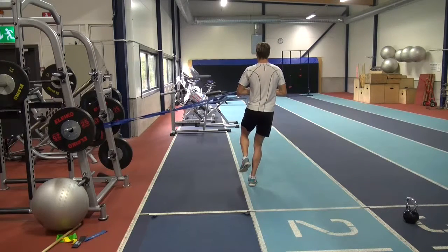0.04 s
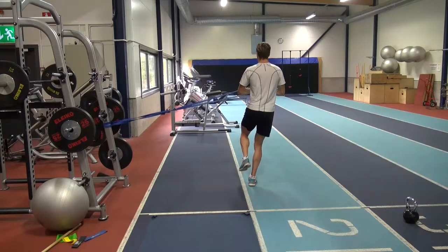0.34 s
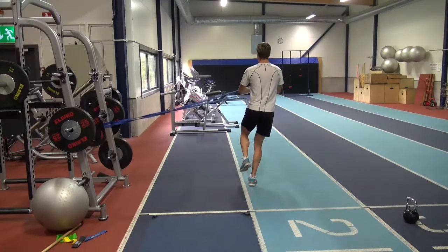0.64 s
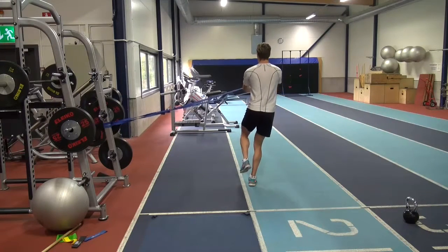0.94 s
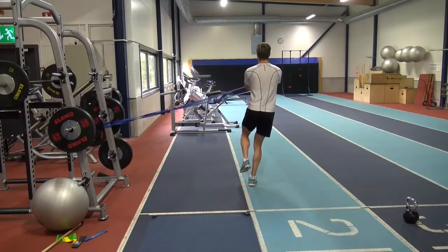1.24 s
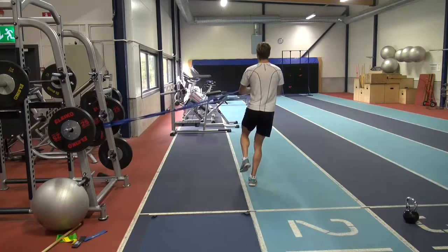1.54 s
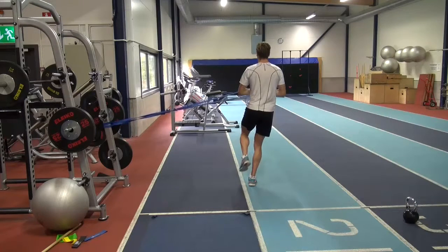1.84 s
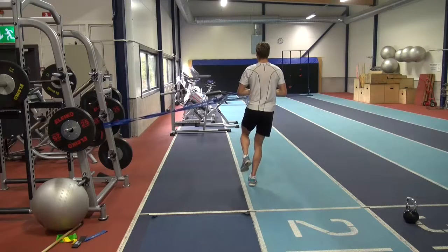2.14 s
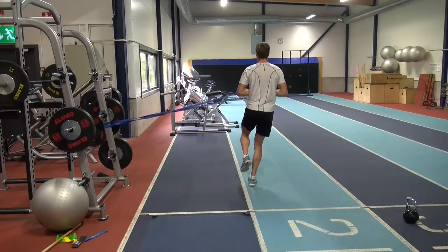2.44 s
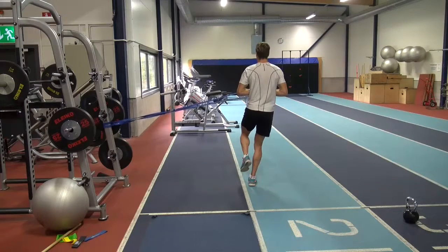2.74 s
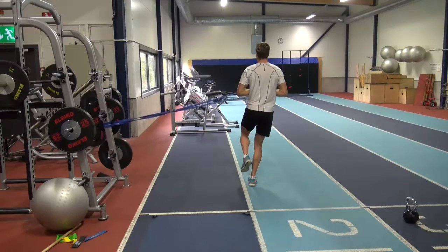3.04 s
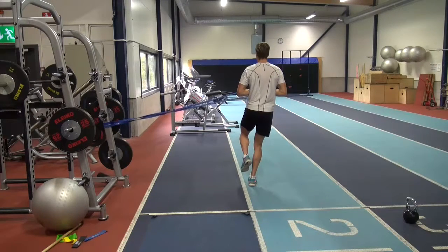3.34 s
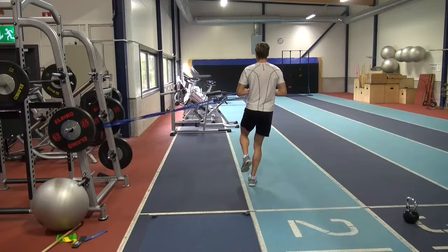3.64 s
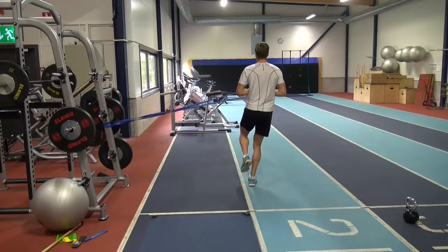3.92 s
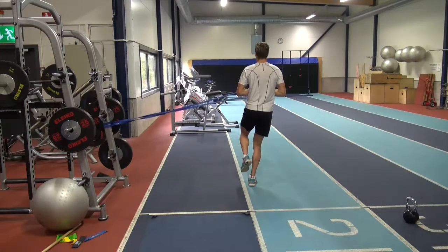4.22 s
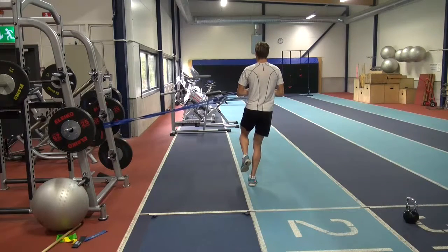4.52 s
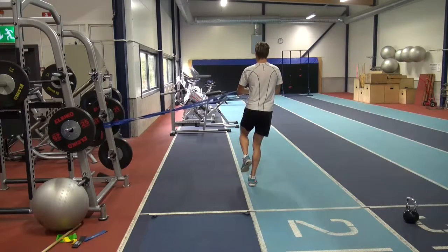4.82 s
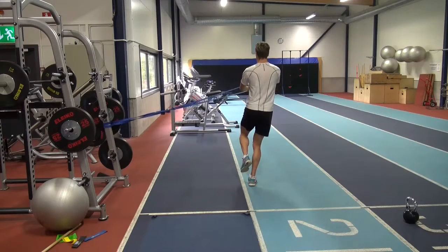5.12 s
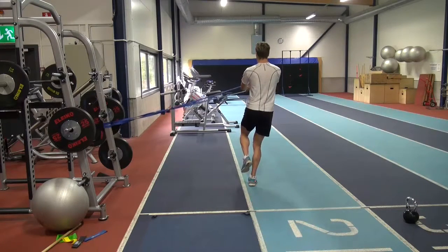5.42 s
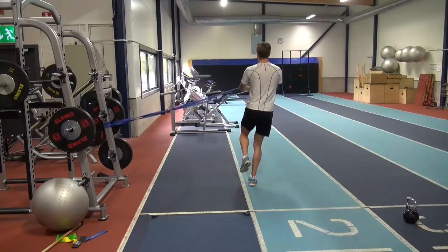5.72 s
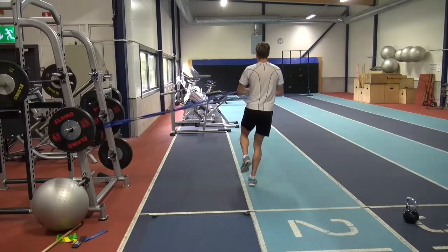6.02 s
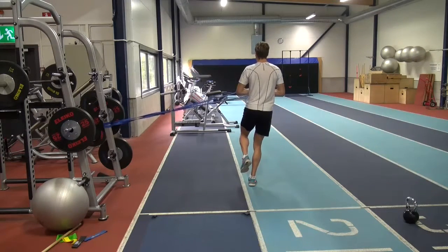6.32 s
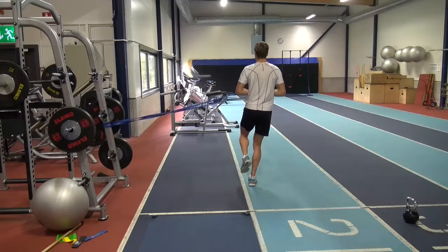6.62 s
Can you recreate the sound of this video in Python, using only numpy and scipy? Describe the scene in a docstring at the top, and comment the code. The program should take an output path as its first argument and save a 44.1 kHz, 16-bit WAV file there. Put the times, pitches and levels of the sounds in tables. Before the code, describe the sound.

Ventilation hums and rushes in a big, echoing gym. A few metres off, a barbell clinks sharply as it is pulled, and clothing rustles softly. After a faint, far squeak, the weight lands with a loud thud and a short rattle. A second run of steel clinks follows, then another heavy drop that bounces and settles with light clinks, ringing on through the hall.

```python
"""Barbell lifts in a sports hall

Two lifts, a few metres away. Steel sleeves and collars clink as the bar is pulled and caught,
and clothes swish; then the rubber plates knock down on the platform, rattle and bounce.
The hall rings on after every blow, over the hum and rush of its ventilation.
A far machine squeaks once."""
import sys
import numpy as np
from scipy import signal
from scipy.fft import rfft, irfft
from scipy.io import wavfile
from scipy.ndimage import uniform_filter1d

SR = 44100
rng = np.random.default_rng(int(sys.argv[2]) if len(sys.argv) > 2 else 0)


def waveform_to_disk(signal):
    """Save audio, clipped to [-1, 1], as 16-bit WAV at the path in sys.argv[1]."""
    frames = np.transpose(np.atleast_2d(signal))
    scaled = np.clip(frames, -1, 1) * 32767
    samples = np.round(scaled).astype(np.int16)
    wavfile.write(sys.argv[1], SR, samples)


N = 302948


def amp(db):
    """Decibels to gain."""
    return 10 ** (np.asarray(db) / 20)


def seconds(length):
    """Time axis of the given length."""
    return np.arange(int(length * SR)) / SR


def fade(t, t60):
    """Free decay, 60 dB down after t60."""
    return np.exp(-np.log(1000) * t / t60)


def add(out, s, sound):
    """Mix a sound in at time s."""
    start = max(int(s * SR), 0)
    out[start:start + len(sound)] += sound[:len(out) - start]


def white(size):
    """Noise of rms 1 with a flat spectrum and random phases."""
    return irfft(np.exp(2j * np.pi * rng.random(size // 2 + 1)), size) * np.sqrt(size)


def colour(x, points, size=4096):
    """EQ through (f/Hz, level/dB) points that keeps the power of white noise."""
    hz, db = np.transpose(points)
    log_hz = np.log(np.maximum(np.fft.rfftfreq(size, 1 / SR), 1))
    curve_db = np.interp(log_hz, np.log(hz), db)
    # minimum phase keeps the attacks sharp
    cepstrum = irfft(np.log(amp(curve_db)))
    cepstrum[1:size // 2] *= 2
    cepstrum[size // 2 + 1:] = 0
    response = irfft(np.exp(rfft(cepstrum)))
    return signal.fftconvolve(x, response / np.linalg.norm(response))[:len(x)]


def drift(rate_hz):
    """Slow random wander of spread 1."""
    lowpass = np.exp(-(np.fft.rfftfreq(N, 1 / SR) / rate_hz) ** 2)
    slow = irfft(rfft(white(N)) * lowpass, N)
    return slow / np.std(slow)


def tone(hz):
    """A sine that follows a pitch curve."""
    return np.sin(2 * np.pi * np.cumsum(hz) / SR)


def spray(envelope, smooth_bins):
    """Dense random impacts under an envelope, about even at all pitches; unit energy."""
    spectrum = rfft(white(len(envelope)) * envelope)
    spectrum /= np.sqrt(uniform_filter1d(np.abs(spectrum) ** 2, size=smooth_bins))
    return irfft(spectrum, len(envelope))


def burst(t, t60):
    """A contact: a spray of tiny impacts that dies quickly."""
    envelope = fade(t, t60)
    return spray(envelope, smooth_bins=201) * np.linalg.norm(envelope) * (t < 2 * t60)


def ring(t, modes, pitch, scatter_db, spread):
    """Struck modes; their strengths and tuning vary with the point of contact."""
    hz, db, t60 = np.transpose(modes)
    strength, detune = rng.standard_normal((2, len(hz)))
    gain = amp(db + scatter_db * strength)
    tuned_hz = hz * pitch * (1 + spread * detune)
    waves = np.sin(2 * np.pi * np.outer(tuned_hz, t)) * fade(t, t60[:, None])
    return gain @ waves / np.linalg.norm(gain)


def ventilation():
    """Room tone: a wavering fan and a motor drone over duct rumble and the steady rush of air."""
    # swell of the fan tone: t/s, relative level/dB
    fan_swell = [(0, -55.4), (0.9, -51.7), (1.7, -53.3), (2.1, -59.4), (3.3, -53.5), (4.3, -55.7),
                 (6.87, -54.0)]
    # spectrum of the ducts: f/Hz, level/dB
    duct_eq = [(20, -17), (35, -3), (57, -6.5), (80, -8), (110, -11), (200, -14), (300, -18), (450, -16.5),
               (900, -53.5)]
    # spectrum of the vents: f/Hz, level/dB
    vent_eq = [(130, -30.5), (215, -6.5), (271, -8.5), (308, -1), (336, -18.5), (508, -8), (607, -7),
               (739, -3.5), (1000, -6.5), (1840, -13), (3150, -17), (15500, -23)]
    fan_hz, motor_hz, flutter_db = 162.6, 55.8, 1.9
    fan_db = np.interp(np.arange(N) / SR, *np.transpose(fan_swell)) - 1 + flutter_db * drift(8.7)
    fan = amp(fan_db) * tone(fan_hz + 1.65 * drift(9.9))
    motor = amp(-62.5) * (1 + 0.36 * drift(2.0)) * tone(motor_hz + 2.33 * drift(4.6))
    rumble = amp(-57.5) * colour(white(N), duct_eq)
    air = amp(-55.48) * colour(white(N), vent_eq)
    return np.sqrt(2) * (fan + motor) + rumble + air


def clinks(end_count=2):
    """Loose sleeves and collars at the ends of the bar clack and set the steel ringing."""
    # knocks on the bar: t/s, clack level/dB, clack cutoff/Hz, ring level/dB, ring centre/Hz
    knocks = [(.124, -35, 4200, -30.5, 3200), (.192, -37.5, 3000, -31.5, 2920),
              (.4335, -25, 3150, -20, 2330), (0.4874, -27, 6900, -24, 3900), (.571, -32, 3580, -27, 3000),
              (2.667, -45, 3000, -28.5, 3000), (3.441, -33.5, 2600, -34.5, 3000),
              (3.474, -31, 2560, -35.5, 3520), (3.743, -25, 3250, -24.5, 2200),
              (3.798, -25, 7400, -22.5, 4700), (3.902, -31, 3000, -24, 1200),
              (4.144, -39.5, 3000, -39, 2400), (4.404, -43, 2430, -46, 2820), (6.091, -47, 2806, -35, 3000),
              (6.184, -46, 2800, -34, 2970)]
    # spectrum of a sleeve's clack: f/Hz, level/dB
    sleeve_eq = [(40, -5), (70, 1), (130, -10.5), (260, -2.5), (550, -2.5), (850, -6), (1220, -1.5),
                 (1900, -7.5), (2550, -3.5), (3800, -8), (5200, -12.5), (6300, -12.5), (10000, -10),
                 (15000, -44)]
    # modes of the bar and its sleeves: f/Hz, level/dB, t60/s
    steel_modes = [(1156, 5, 0.086), (1226, 5, 0.04), (1525, -19, .05), (2346, -1.5, 0.052),
                   (2510, 2, 0.033), (2796, 2, 0.037), (3020, -2.5, 0.083), (3044, 0, 0.11),
                   (3500, -10, 0.058), (3860, -11.5, 0.045), (4190, -5.5, 0.069), (4680, -5.5, 0.074),
                   (5150, -5, 0.095), (5280, -3.5, 0.089), (5400, -8.5, 0.12), (5830, -9, 0.057),
                   (6800, -13.5, 0.066), (7750, -6, 0.055), (7970, -3, .07), (9300, -5, 0.067),
                   (10200, -8, 0.065), (12700, -8, .06)]
    ends, t = np.zeros((end_count, N)), seconds(.3)
    attack = 1 - np.exp(-(t / 0.0027) ** 2)  # the sleeve slides home rather than meeting the bar flat
    contacts = [contact for knock in knocks for contact in rebound(*knock)]
    for k, (s, clack_db, cutoff_hz, ring_db, centre_hz) in enumerate(contacts):
        lowpass = signal.butter(3, cutoff_hz, fs=SR)
        clack = signal.lfilter(*lowpass, colour(burst(t, t60=0.08), sleeve_eq))
        # the place of the contact favours the modes around one pitch
        modes = [(hz, db - 11 * abs(np.log2(hz / centre_hz)), t60) for hz, db, t60 in steel_modes]
        steel = ring(t, modes, pitch=1, scatter_db=3.5, spread=0.0085)
        clink = attack * (amp(clack_db - 1) * clack + amp(ring_db - 5) * steel)
        add(ends[k % end_count], s, clink)
    return sum(end + amp(-7.5) * hall(end) for end in ends)


def rebound(s, clack_db, cutoff_hz, ring_db, centre_hz):
    """The two contacts of one clink: the sleeve strikes, springs back and strikes more softly."""
    return [(s, clack_db, cutoff_hz, ring_db, centre_hz),
            (s + .017, clack_db - 4.5, cutoff_hz, ring_db - 3.5, centre_hz)]


def hall(x):
    """Reverb from one spot: dense reflections off floor and racks, a long tail, a soft far-wall slap."""
    # reverb bands: f/Hz, early level/dB, tail level/dB, tail t60/s
    bands = [(60, -2, 4.5, 1.75), (159, 2, -6.5, 4.3), (416, 7.5, -6.5, 4), (1050, 3, -6, 3),
             (2380, 4, -4.5, 2.8), (5180, 3, -7.5, 1.83), (8500, -0.5, -18, 1), (14300, -32, -25, 0.2)]
    t = seconds(2)
    log_hz = np.log(np.maximum(np.fft.rfftfreq(len(t), 1 / SR), 1))
    centres = np.log([row[0] for row in bands])
    early_envelope = fade(t, 0.41) * (1 - np.exp(-(t / 0.0065) ** 2))
    early_spectrum = rfft(spray(early_envelope, smooth_bins=121) * (t < 1))
    tail_spectrum = rfft(white(len(t)))
    far_wall = 1 + 0.63 * np.exp(-((t - .265) / 0.065) ** 2)
    response = np.zeros(len(t))
    for share, (_, early_db, tail_db, t60) in zip(np.eye(len(bands)), bands):
        band = np.interp(log_hz, centres, share)
        decay = fade(t, t60) * (1 - np.exp(-t / 0.032)) * far_wall
        response += amp(early_db) * irfft(early_spectrum * band, len(t))
        response += amp(tail_db) * irfft(tail_spectrum * band, len(t)) * decay / np.linalg.norm(decay)
    return signal.fftconvolve(x, response)[:N]


def clothes():
    """Fabric hisses briefly as the lifter pulls."""
    # one swish a pull: t/s, level/dB, half length/s
    swishes = [(0.41, -56, 0.089), (3.734, -57, 0.14)]
    t = np.arange(N) / SR
    swell = sum(amp(db) * np.exp(-((t - s) / half_length) ** 2) for s, db, half_length in swishes)
    flutter = amp(2 * drift(40))
    hiss = colour(white(N), [(1000, 2), (5000, 0), (12000, 3), (15500, -10)])
    return swell * flutter * hiss


def squeak():
    """Dry friction in a far machine gives a faint, unsteady tone."""
    # the squeak: t/s, length/s, f/Hz, level/dB
    chirp = (1.64, .2, 1480, -59)
    s, length, hz, db = chirp
    out = np.zeros(N)
    whine = tone(hz * (1 + .012 * drift(40)))
    swell = np.sin(np.pi * seconds(length) / length)
    add(out, s, amp(db) * swell * whine[:len(swell)])
    return out


def landings(spot_count=3):
    """Each landing thuds in the platform, clacks in the plates and cracks at their edge."""
    # main blows, one list a drop: t/s, thud level/dB, thud pitch ratio, clack level/dB, crack level/dB
    drops = [
        [(2.3712, -10, 1.44, -14, -11.5), (2.3845, -15, 1.15, -23, -6), (2.4025, -3, 0.96, -17.5, -38),
         (2.411, -9, 1.1, -19.5, -34), (2.5, -18, 0.99, -26.5, -55)],
        [(5.741, -9.5, 1.7, -8, -11.5), (5.7536, -3.5, 0.93, -14.5, -19.5), (5.7755, -14.5, 1.09, -27, -26),
         (5.801, -17, 1.3, -16, -44)],
    ]
    # modes of the platform: f/Hz, level/dB, t60/s
    platform_modes = [(72.7, -26.5, 0.26), (117.8, -21.5, 0.11), (258, -15, 0.022), (328.5, -3, 0.034),
                      (405.2, 1.5, .035), (500, -4, 0.027), (658, -11.5, 0.034)]
    # spectrum of a plate's clack: f/Hz, level/dB
    clack_eq = [(100, -10.5), (400, 1), (750, 3.5), (1200, 2), (1850, -6), (2450, -7), (4000, -14),
                (5500, -33.5), (12000, -30)]
    # spectrum of the crack at its edge: f/Hz, level/dB
    crack_eq = [(300, 2.5), (2000, -2), (4000, 1.5), (5800, -5.5), (8000, -5.5), (10400, -2),
                (12500, -13.5), (15000, -25)]
    direct, spots, t = np.zeros(N), np.zeros((spot_count, N)), seconds(.5)
    attack = 1 - np.exp(-t / .0011)  # rubber gives way and softens the thud
    contacts = [contact for blows in drops for contact in drop(blows)]
    for k, (s, thud_db, pitch, clack_db, crack_db) in enumerate(contacts):
        thud = amp(thud_db - 1.5) * attack * ring(t, platform_modes, pitch, scatter_db=2.5, spread=0.019)
        clack = amp(clack_db - 2.5) * colour(burst(t, t60=0.029), clack_eq)
        crack = amp(crack_db - 2.5) * colour(burst(t, t60=0.0048), crack_eq)
        add(direct, s, thud + clack + crack)
        # the plates touch down in turn at different spots; the platform stirs the hall less than they do
        add(spots[k % spot_count], s, amp(-5) * thud + clack + crack)
    return direct + sum(hall(spot) for spot in spots)


def drop(blows, rattle_count=6):
    """All contacts of one drop, laid out like its blows: floor tremor, boom, blows, rattle, bounces."""
    # the bar bounces and settles: delay/s, thud level/dB, thud pitch ratio, clack level/dB
    settling = [(.24, -29, 0.88, -29.5), (.325, -31, .25, -49), (.656, -29.5, .8, -55)]
    start, silent = blows[0][0], -np.inf
    tremor = (start - 0.01475, -26, 0.8, silent, silent)  # the floor carries the blow ahead of the air
    boom = (start - 0.0034, -18, .2, silent, silent)  # the whole floor gives under the weight
    # the loose plates rattle, growing weaker and much duller
    gap_s, jitter_s, fall_db_per_s, dulling_db_per_s = .012, .002, 25, 250
    rattle = []
    for age in gap_s * np.arange(rattle_count) + jitter_s * rng.standard_normal(rattle_count):
        fall_db, dulling_db = fall_db_per_s * age, dulling_db_per_s * age
        rattle.append((start + .02 + age, -21 - fall_db, 1.1, -24.5 - fall_db, -29.5 - dulling_db))
    bounces = [(start + delay, thud_db, pitch, clack_db, clack_db - 14)
               for delay, thud_db, pitch, clack_db in settling]
    return [tremor, boom, *blows, *rattle, *bounces]


def scene():
    """Mono mix of the lifts, the far squeak and the ventilation."""
    return (landings() + clinks() + clothes() + squeak() + ventilation())[None]


def record(dry):
    """Master chain: thin the deep bass, round the highest peaks and cut the top."""
    low_cut = signal.butter(2, 36, "high", fs=SR, output="sos")
    high_cut = signal.ellip(10, .1, 70, 15700, fs=SR, output="sos")
    rounded = np.tanh(signal.sosfilt(low_cut, dry))
    return signal.sosfilt(high_cut, rounded)


dry = scene()
out = record(dry)
waveform_to_disk(out)
```